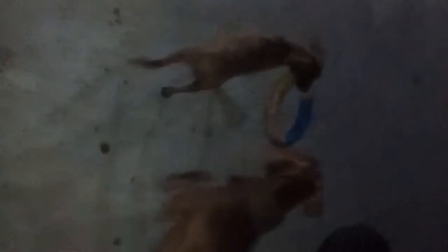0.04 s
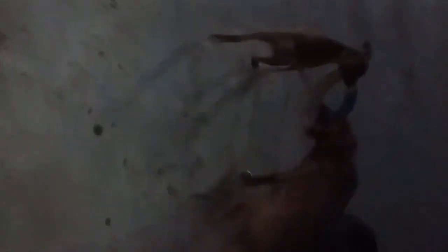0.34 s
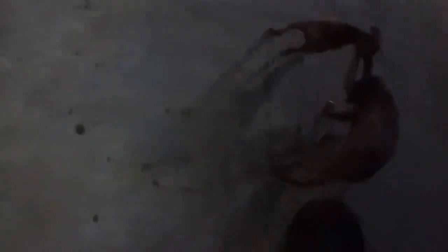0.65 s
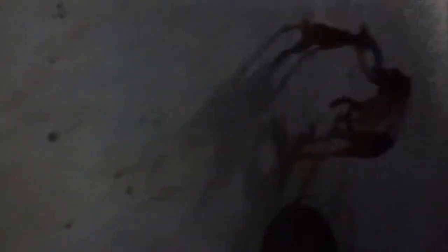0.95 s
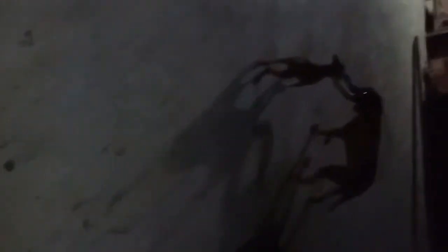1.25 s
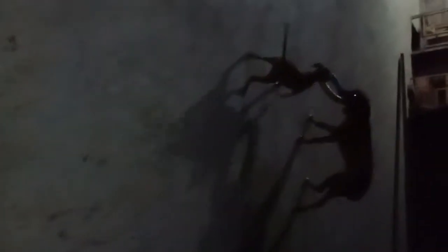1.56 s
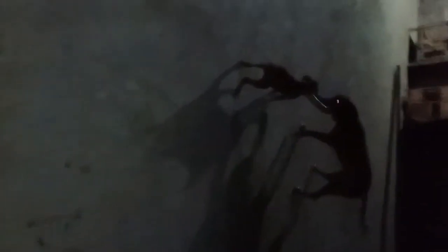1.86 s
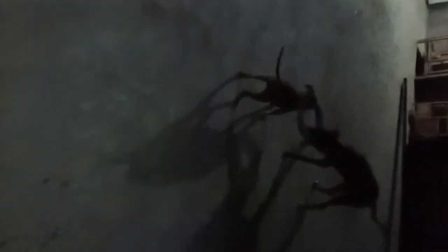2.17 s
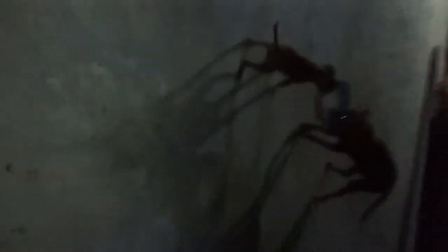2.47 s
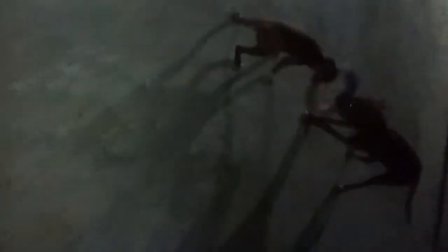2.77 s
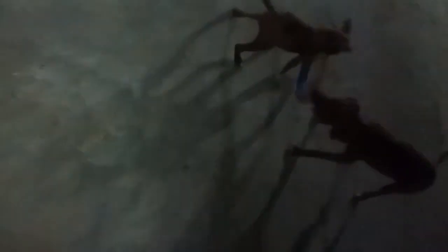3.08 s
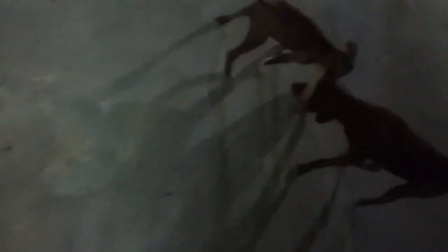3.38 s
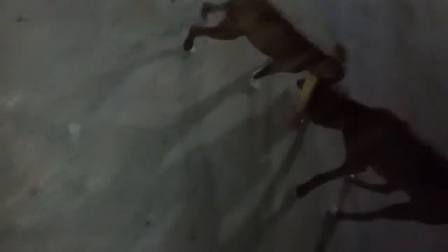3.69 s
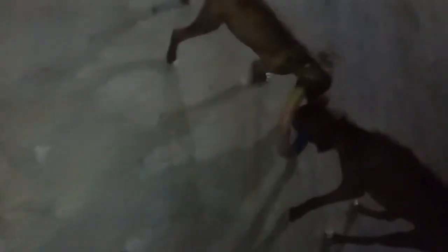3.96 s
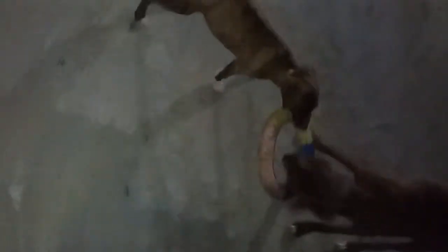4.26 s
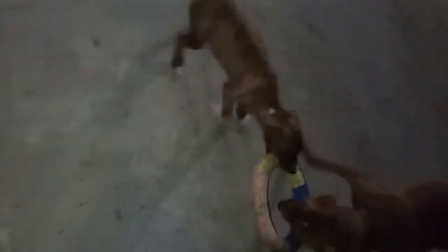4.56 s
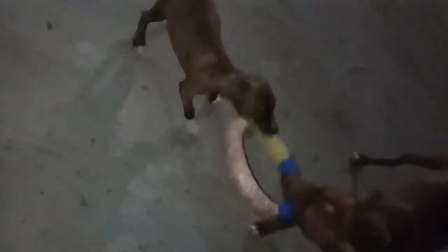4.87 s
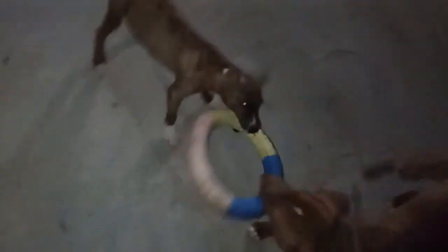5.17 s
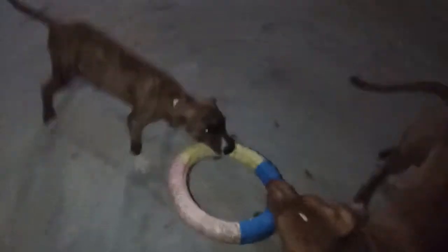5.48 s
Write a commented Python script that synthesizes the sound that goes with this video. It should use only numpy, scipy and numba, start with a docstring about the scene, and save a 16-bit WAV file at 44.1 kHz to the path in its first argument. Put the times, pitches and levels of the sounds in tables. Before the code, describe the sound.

Young dogs play tug with a rubber toy in a bare, slightly echoing room, heard from close by. A tap on the microphone and faint snuffling come first, then low, fluttering growls follow one another with short breaks. Paws scrape the concrete and claws click now and then. A sharp knock of teeth lands during a stronger growl late on, and the final growl ends in a small whine.

```python
"""Two young dogs tug at a ring toy on the concrete floor of a bare room, whose hard walls answer them.
First the microphone's case is tapped; paws scuff, claws click and the dogs snuffle round the toy.
From 0.75 s they growl in short runs: uneven throat pulses, shaken by a slow flutter, ring in chest,
nose and a mouth clamped on the toy. Near 2.9 s a tooth squeaks on the rubber, near 4.4 s teeth knock
together, and at 5.5 s the last growl tightens into a whine."""
import sys
import numpy as np
from scipy import signal
from scipy.fft import rfft, irfft
from scipy.io import wavfile
from scipy.ndimage import uniform_filter1d
from numba import njit

SR = 44100
rng = np.random.default_rng(int(sys.argv[2]) if len(sys.argv) > 2 else 0)


def log_audio(samples):
    """Write samples as a 16-bit WAV file to the path given in sys.argv[1]."""
    # one column per channel
    frames = np.atleast_2d(samples).T
    # limit to full scale, then quantise
    limited = np.clip(frames, -1, 1)
    pcm = np.round(limited * 32767).astype(np.int16)
    wavfile.write(sys.argv[1], SR, pcm)


N = 252693
TIME = np.arange(N) / SR

# Spectrum of the surroundings. Each row: frequency in Hz, relative spectral density in dB.
AIR_SPECTRUM = [(30, -19.5), (100, 1), (200, 1.5), (360, -7.5), (560, -15), (850, -10.5), (1250, -10),
                (1700, -17), (2700, -23.5), (4400, -20.5), (5400, -28), (6200, -38.5), (7500, -22.5),
                (13000, -60.5)]
# First reflections off floor and walls. Each row: mean delay in seconds, gain in dB.
REFLECTIONS = [(.0055, -21.5), (0.0143, -12), (0.0207, -20.5)]
# A tap on the microphone's case. Its one row: start in seconds, crack peak in dB, thump level in dB,
# thump centre in Hz, thump decay time in seconds.
TAP = (0.0045, -21, -40, 480, .007)
# Modes of the case. Each row: frequency in Hz, relative level in dB, time to fall 60 dB in seconds.
TAP_MODES = [(1280, -16, 0.01), (2700, -1.5, 0.0055), (3930, -3.5, 0.0058)]
# Paws landing. Each row: start in seconds, initial level in dB.
PAW_STEPS = [(0.29, -67), (0.588, -58), (2.939, -41)]
# Single scuffs of paws, from faint to loud. Each row: start in seconds, level in dB,
# fade time in seconds, lowest resonance in Hz.
PAW_SCUFFS = [(0.135, -51.5, 0.0078, 3420), (0.205, -61, 0.063, 3600), (0.591, -45, 0.0075, 3700),
              (0.615, -60, 0.077, 3570), (.69, -59.5, 0.036, 3100), (1.42, -66.5, 0.063, 3900),
              (2.076, -68.5, 0.037, 2820), (4.015, -73, 0.077, 3300), (4.06, -64.5, 0.031, 1920),
              (5.124, -49, 0.0098, 2460), (2.24, -55.5, 0.034, 3740), (2.489, -52.5, 0.02, 2720),
              (2.708, -45, 0.036, 2940), (2.805, -50.5, 0.048, 2570), (2.88, -50, 0.029, 2900),
              (3.03, -54, 0.039, 2470), (2.94, -39, 0.019, 2920), (3.253, -49, 0.03, 2900),
              (3.36, -55, 0.047, 2780), (3.48, -72, 0.075, 3470), (3.731, -61, 0.035, 2970),
              (3.78, -58, 0.011, 2970), (4.837, -50, 0.1, 3250), (4.938, -30.5, 0.01, 2570),
              (5.058, -48, 0.024, 2470), (5.225, -31.5, 0.025, 2860), (5.406, -40, 0.011, 2970),
              (5.482, -39.5, 0.019, 2980)]
# Clicks of teeth and claws. Each row: start in seconds, peak in dB, centre in Hz.
HARD_CLICKS = [(0.139, -48, 5000), (2.243, -42, 5550), (2.443, -31.5, 4050), (2.946, -32, 2580),
               (2.962, -33, 3900), (3.52, -52.5, 4200), (4.908, -36, 4636), (4.948, -29, 4610),
               (5.232, -26, 4350)]
# A tooth slips on the rubber. Its one row: start and length in seconds, peak in dB,
# first and last frequency in Hz.
TOOTH_SLIP = (2.936, .012, -34, 1600, 2900)
# Teeth knock together, and a wall returns the knock. Each row: start in seconds, peak in dB.
TOOTH_KNOCKS = [(4.3618, -14), (4.3755, -39)]
# Modes of a knock. Each row: frequency in Hz, relative level in dB, time to fall 60 dB in seconds.
TOOTH_MODES = [(1800, -17, 0.004), (2570, 1, 0.01), (3020, -5.5, 0.011), (3510, -5.5, 0.01),
               (4210, -14.5, 0.0075)]
# Air drawn past the toy. Each row: start and length in seconds, level in dB, resonance in Hz.
SNUFFLE_BREATHS = [(0.183, 0.066, -67, 1362), (0.447, 0.09, -60, 392), (0.525, 0.041, -56, 1324),
                   (0.585, 0.11, -50.5, 1228), (0.629, .009, -47, 1254), (1.295, 0.041, -57.5, 1240),
                   (1.384, 0.0543, -51, 1395), (2.075, 0.044, -46.5, 1293), (3.952, 0.051, -56.5, 1294)]
# Hard catches in the throat. Each row: start in seconds, peak in dB, mouth resonance in Hz.
THROAT_CATCHES = [(1.007, -24.5, 1043), (1.073, -22.5, 960), (1.471, -41.5, 960), (1.51, -33, 920),
                  (1.643, -28.5, 953), (2.607, -24, 990), (3.327, -37.5, 1110), (4.159, -25, 1086),
                  (4.228, -23, 1034), (4.283, -24, 1005), (4.306, -22.5, 936), (5.653, -21, 774)]
# The lips part and one resonance rings out. Each row: start and length in seconds,
# first and last centre in Hz, level in dB.
LIP_FLARES = [ (1.066, 0.048, 5100, 5430, -67.5), (1.517, 0.12, 3160, 3230, -66),
              (1.723, 0.048, 3170, 3630, -61), (1.812, 0.068, 5490, 5500, -74.5),
              (1.886, 0.064, 3000, 3300, -67), (2.311, 0.074, 830, 844, -40),
              (2.329, 0.094, 3530, 3350, -61.5), (2.619, 0.041, 1250, 1150, -37.5),
              (2.53, 0.075, 2710, 2750, -63.5), (3.699, 0.13, 2860, 2870, -63.5),
              (4.152, .16, 1100, 980, -32), (4.146, 0.11, 5460, 5440, -63), (4.241, .09, 5100, 4740, -54.5),
              (4.432, 0.13, 4900, 4940, -57), (4.648, 0.042, 5450, 5420, -63.5),
              (5.161, 0.047, 776, 764, -52.5), (5.218, 0.038, 1110, 1100, -43.5),
              (5.58, .14, 2120, 2300, -67)]
# Clear chest tones, one curve for each. Each row: time in seconds, frequency in Hz, level in dB.
CHEST_CURVES = [
    [(3.2, 143.7, -47), (3.3, 140, -52), (3.39, 147.5, -45), (3.48, 135.6, -53), (3.55, 138.3, -55),
     (3.6, 140, -51), (3.78, 138, -48.5), (3.83, 136.8, -58)],
    [(4.17, 171, -47.5), (4.378, 158.4, -42), (4.544, 158.9, -48.5), (4.612, 167.2, -38),
     (4.76, 161.3, -46), (4.884, 153, -48.5), (4.91, 169, -41.5), (4.97, 170, -59)],
    [(5.28, 193.5, -51.5), (5.32, 190.3, -35), (5.39, 207.8, -49), (5.444, 189.3, -46.5),
     (5.578, 178.2, -36), (5.626, 185.5, -47), (5.666, 211, -48), (5.729, 208, -45)],
]
# The closing whine. Each row: time in seconds, frequency in Hz, level in dB.
WHINE_CURVE = [(5.478, 700, -46), (5.5, 656, -43), (5.535, 615, -49), (5.58, 678, -37.5),
               (5.63, 711.5, -30), (5.675, 706, -40.5), (5.729, 705, -39)]
# Harder pulls on the jaw swell or dip the mouth's sound. Each row: time and half-width in seconds,
# change of level in dB.
JAW_TUGS = [(1.059, 0.03, 4.5), (2.47, 0.011, 4), (3.385, 0.026, 4), (3.55, .018, -6), (3.641, .025, 0.5),
            (3.811, 0.055, 6), (5.63, 0.029, -1.5)]
# The mouth's cluster of resonances. Each row: multiple of its centre, width in Hz, gain in dB.
MOUTH_FORMANTS = [(.66, 170, -6), (.83, 128.3, 1), (1.0, 164.5, 5), (1.15, 140, -3), (1.31, 169.7, -1.5),
                  (1.55, 220, -31.5)]
# That centre as the grip shifts, one curve per growl. Each row: time in seconds, centre in Hz.
JAW_CURVES = [
    [(.77, 1040), (.88, 1015), (1.0, 1038), (1.08, 977), (1.3, 940)],
    [(1.46, 1036), (1.58, 960), (1.75, 992), (1.9, 920), (2.05, 970)],
    [(2.3, 833), (2.47, 906), (2.6, 877)],
    [(2.6, 1000), (2.65, 1034), (2.72, 900), (2.9, 887)],
    [(3.2, 1046), (3.38, 1100), (3.5, 1166), (3.63, 1180), (3.8, 1115), (3.95, 1000)],
    [(4.15, 1093), (4.25, 1012), (4.34, 917), (4.48, 905), (4.57, 912), (4.7, 920), (4.82, 947),
     (5.05, 810)],
    [(5.17, 800), (5.23, 1130), (5.3, 955), (5.42, 753), (5.52, 667), (5.65, 740), (5.73, 740)],
]
# The snarl's upper resonances, one set per growl. Each row: centre in Hz, relative level in dB.
SNARL_FORMANTS = [
    [(1850, 0.5), (2780, -6.5), (3520, -7), (4680, -2), (5400, -11)],
    [(1980, 5), (2220, 4), (3250, -2), (3540, -15), (4560, -17.5), (5450, -14)],
    [(1600, -1.5), (2150, 2.5), (2700, -5.5), (3400, -8), (5500, -13.5)],
    [(1880, -4), (2780, -0.5), (3550, -15), (5420, -2)],
    [(2250, 9), (2950, 5), (3600, -2.5), (4500, 6), (5450, 4)],
    [(2180, 8.5), (2850, -0.5), (3320, 2.5), (5020, -11), (5550, -14)],
    [(2170, -2), (3190, 5), (4680, -11.5), (5500, -15)],
]
# The throat in each growl. Each row: chest and nose resonance in Hz, nose gain relative to the chest
# in dB, rasp level relative to the mouth in dB.
THROAT_SHAPES = [ (166, 380, 3.5, -24), (149.7, 373, -5, -19.5), (208, 462, -3.5, -19.5),
                 (170, 420, 1.5, -22), (102, 371, 2.5, -27.5), (170, 452, -6, -17.5), (168, 422, -1, -13)]
# The growls. Each row: start, attack, hold, release and lag of the mouth's opening in seconds,
# mouth and chest level in dB, sag in dB per second, pulse rate in Hz.
GROWL_RUNS = [ (0.752, 0.077, .32, 0.24, 0.0035, -38, -41.5, 1.5, 122),
              (1.444, 0.052, 0.48, 0.1, 0.00038, -38.5, -43.5, 7, 135.6),
              (2.296, 0.028, 0.285, 0.093, 0.0, -36, -38.5, 26, 106.4),
              (2.574, 0.084, 0.054, 0.35, 0.0, -32.5, -36.5, 9, 109.8),
              (3.152, 0.041, 0.66, 0.09, 0.04, -49, -47, 2.5, 140),
              (4.145, 0.027, 0.79, 0.15, 0.0, -34.5, -40.5, 1, 166.1),
              (5.162, 0.032, 0.49, 0.11, 0.037, -43, -39.5, -7.5, 185.2)]

JITTER, FLUTTER_HZ = .2, 44.91  # relative spread of the pulse periods; rate of the loose tissue
FLUTTER_DB_PER_HZ = 0.03  # a higher, more strained growl flutters more deeply
MOUTH_TOP_HZ = 1540  # low-pass corner of chest, nose and mouth; the rasp lies above
NOSE_DIP_HZ, NOSE_DIP_Q, NOSE_DIP_SHARE = 571, 4.8, 0.68
LIP_RISE_OCTAVES_PER_S = 0.063  # the lips draw back through a growl, lifting the upper resonances


def from_db(db):
    """Amplitude grows tenfold with every 20 dB."""
    return 10 ** (np.asarray(db) / 20)


def rms_one(x):
    """Division by the root mean square gives unit power."""
    return x / np.sqrt(np.mean(x ** 2) + 1e-20)


def even_power(x, span_s=0.027):
    """Division by a running RMS steadies the power; single pulses keep their contrast."""
    size = int(span_s * SR)
    power = uniform_filter1d(uniform_filter1d(x * x, size), size)
    return x / np.sqrt(np.abs(power) + 1e-14)


def butter(x, hz, kind, order=2):
    """A causal Butterworth filter has a maximally flat passband."""
    sections = signal.butter(order, np.clip(hz, 10, .45 * SR), kind, fs=SR, output="sos")
    return signal.sosfilt(sections, x + 1e-18)


@njit
def two_pole(x, angle, r):
    """A pair of poles at radius r and a moving angle resonates with a peak gain of 1."""
    y = np.zeros(len(x))
    for i in range(2, len(x)):
        drive = (1 - r * r) / 2 * (x[i] - x[i - 2])
        y[i] = drive + 2 * r * np.cos(angle[i]) * y[i - 1] - r * r * y[i - 2]
    return y


def resonate(x, hz, width_hz):
    """Two equal resonators in cascade give one peak with steep skirts."""
    angle, r = np.ones(len(x)) * 2 * np.pi * hz / SR, np.exp(-np.pi * width_hz / SR)
    return two_pole(two_pole(x, angle, r), angle, r)


def add(track, s, sound):
    """Superposition: a sound adds to the track from s seconds on."""
    at = max(int(s * SR), 0)
    track[at:at + len(sound)] += sound[:N - at]


def drift(size, hz):
    """Noise low-passed at hz wanders smoothly, with a spread of about 1."""
    slow = butter(rng.standard_normal(N + SR), hz, "low")[SR:]
    return rms_one(slow)[:size]


def struck(modes, t):
    """Free vibration after a blow is a sum of damped sinusoids."""
    return sum((-1) ** k * from_db(db - 60 * t / t60) * np.sin(2 * np.pi * hz * t)
               for k, (hz, db, t60) in enumerate(modes))


def air(level_db=-65):
    """Stationary noise with a shaped spectrum is the murmur of the surroundings."""
    hz, db = np.transpose(AIR_SPECTRUM)
    gain = from_db(np.interp(np.log(np.fft.rfftfreq(N, 1 / SR) + 1), np.log(hz), db))
    return from_db(level_db) * rms_one(irfft(rfft(rng.standard_normal(N)) * gain, N))


def room(x, t60_s=0.48, tail_db=-5.5, wall_cut_hz=4800):
    """Reverberation: a few distinct reflections and a diffuse tail that has lost its treble."""
    t = TIME[:SR]
    tail = rng.standard_normal(SR) * from_db(-60 * t / t60_s) * np.clip(t / 0.0027, 0, 1)
    response = butter(from_db(tail_db) * tail / np.linalg.norm(tail), wall_cut_hz, "low", order=3)
    for delay_s, db in REFLECTIONS:
        response[int(delay_s * rng.uniform(.85, 1.15) * SR)] += from_db(db)
    return signal.fftconvolve(x, response)


def moving_room(x, step_s=.16):
    """Echo paths change as the dogs move: cross-faded room responses join the direct sound."""
    out, step = np.zeros(N), int(step_s * SR)
    for centre in range(0, N + step - 1, step):
        at = np.arange(max(centre - step, 0), min(centre + step, N))
        add(out, at[0] / SR, room(x[at] * np.cos(np.pi / 2 * (at - centre) / step)))
    return x + out


def case_tap(width_hz=450, top_hz=4600):
    """An impact excites the case's modes and a dull thump, too close to stir the room."""
    s, crack_db, thump_db, hz, fade_s = TAP
    out, t = np.zeros(N), TIME[:SR // 5]
    crack = butter(struck(TAP_MODES, t), top_hz, "low", order=6)
    thump = rms_one(resonate(rng.standard_normal(len(t)), hz, width_hz)) * np.exp(-t / fade_s)
    add(out, s, from_db(crack_db) * crack / np.abs(crack).max() + from_db(thump_db) * thump)
    return out


def steps(fade_s=0.041, band_hz=(110, 520)):
    """A soft impact holds mainly low frequencies: pads thud on the concrete."""
    out, t = np.zeros(N), TIME[:SR // 4]
    for s, db in PAW_STEPS:
        thud = rms_one(butter(rng.standard_normal(len(t)), band_hz, "band"))
        add(out, s, from_db(db) * thud * np.exp(-t / fade_s))
    return out


def shuffles(per_s=7, db=-67.5, spread_db=3, fade_s=0.017, hz=2780, spread_octaves=0.3):
    """Random scatter about a walking pace gives rows of faint scuffs, varied in level and colour."""
    rows = [((k + .5 + late / 2) / per_s, db + spread_db * loud, fade_s,
             hz * 2 ** (spread_octaves * bright))
            for k, (late, loud, bright) in enumerate(rng.uniform(-1, 1, (60, 3)))]
    return [row for row in rows if row[0] < N / SR]


def scuffs(grit_db=2.5, clump_db=2.8, spacing_hz=502, width_hz=400, scatter_hz=130, rise_s=0.003,
           bare_db=-21, top_band_db=-27):
    """Sliding friction: pads and claws drag over grit in clumps of grains until the paw grips."""
    out, t = np.zeros(N), TIME[:SR // 2]
    for s, db, fade_s, lowest_hz in PAW_SCUFFS + shuffles():
        grains = rng.standard_normal(len(t))
        grains *= from_db(grit_db * drift(len(t), 800) + clump_db * drift(len(t), 60))
        centres = lowest_hz + spacing_hz * np.arange(5) + scatter_hz * rng.standard_normal(5)
        ringing = sum(resonate(grains, hz, width_hz) for hz in centres)
        scrape = rms_one(ringing + from_db(bare_db) * butter(grains, 1400, "high"))
        # A very faint high fizz is heard during each scuff.
        top_band = from_db(top_band_db) * rms_one(butter(grains, 14000, "high", order=4))
        envelope = (1 - np.exp(-t / rise_s)) * np.exp(-(t / fade_s) ** 2 / 2)
        add(out, s, from_db(db) * (scrape + top_band) * envelope)
    return out


def clicks(width_hz=950, contact_s=0.0016):
    """A brief, hard contact of tooth or claw excites one broad, high resonance."""
    out, t = np.zeros(N), TIME[:SR // 20]
    for s, db, hz in HARD_CLICKS:
        crack = resonate(rng.standard_normal(len(t)) * np.exp(-t / contact_s), hz, width_hz)
        add(out, s, from_db(db) * crack / np.abs(crack).max())
    return out


def squeak():
    """A friction tone rises with sliding speed: a tooth slips ever faster on the rubber."""
    s, length_s, db, first_hz, last_hz = TOOTH_SLIP
    out, progress = np.zeros(N), np.linspace(0, 1, int(length_s * SR))
    phase = 2 * np.pi * np.cumsum(first_hz + (last_hz - first_hz) * progress ** 3) / SR
    add(out, s, from_db(db) * np.sin(phase) * np.sin(np.pi * progress))
    return out


def knocks(low_hz=1500, top_hz=4100):
    """Heavily damped modes make the collision of teeth a short, dull knock."""
    out, t = np.zeros(N), TIME[:SR // 20]
    knock = butter(butter(struck(TOOTH_MODES, t), top_hz, "low", order=8), low_hz, "high")
    for s, db in TOOTH_KNOCKS:
        add(out, s, from_db(db) * knock / np.abs(knock).max())
    return out


def snuffles(width_hz=130, upper_hz=2700, upper_db=-34, rough_db=3, rough_hz=60):
    """Turbulence: air sucked past the toy flutters and rings in the narrow mouth."""
    out = np.zeros(N)
    for s, length_s, db, hz in SNUFFLE_BREATHS:
        flow = rng.standard_normal(SR) * from_db(rough_db * drift(SR, rough_hz))
        upper = from_db(upper_db) * resonate(flow, upper_hz, width_hz=1900)
        breath = (resonate(flow, hz, width_hz) + upper)[:int(length_s * SR)]
        add(out, s, from_db(db) * rms_one(breath) * signal.windows.tukey(len(breath), .6))
    return out


def catches(width_hz=220):
    """The mouth's impulse response sounds when the folds slap shut once, hard."""
    out = np.zeros(N)
    for s, db, hz in THROAT_CATCHES:
        ringing = resonate(signal.unit_impulse(SR // 20, 2), hz, width_hz)
        pop = butter(ringing, MOUTH_TOP_HZ, "low", order=3)
        add(out, s, from_db(db) * pop / np.abs(pop).max())
    return out


def cycle_starts(hz, jitter, size):
    """Jitter: periods of random length add up to the sample positions of an uneven oscillation."""
    at = np.cumsum(np.exp(jitter * rng.standard_normal(400)) * SR / hz).astype(int)
    return at[at < size]


def throat_pulses(size, pitch_hz, flutter_db, flutter_jitter=0.287, puff_s=0.0095):
    """The glottal source: closures of the folds, each with a turbulent puff, modulated by loose tissue."""
    swells = np.r_[0, cycle_starts(FLUTTER_HZ, flutter_jitter, size + SR // 10)]
    closures = cycle_starts(pitch_hz, JITTER, size)
    flutter = np.cos(2 * np.pi * np.interp(closures, swells, np.arange(len(swells))))
    pulses = np.zeros(size)
    pulses[closures] = from_db(flutter_db * flutter)
    puff_envelope = signal.lfilter([1], [1, -np.exp(-1 / (puff_s * SR))], pulses)
    return rms_one(pulses), rms_one(puff_envelope * rng.standard_normal(size))


def flares(width_hz=330, pitch_hz=140, breath=2.1, flutter_db=2.0):
    """A formant glide: as the lips part, throat pulses ring in one moving resonance."""
    out = np.zeros(N)
    for s, length_s, first_hz, last_hz, db in LIP_FLARES:
        size = int(length_s * SR)
        pulses, puffs = throat_pulses(size, pitch_hz, flutter_db)
        ringing = resonate(pulses + breath * puffs, np.linspace(first_hz, last_hz, size), width_hz)
        add(out, s, from_db(db) * rms_one(ringing) * signal.windows.tukey(size, .3))
    return out


def tone(curve, waver, rough_db, octave_db):
    """Nearly periodic vibration gives a fundamental and its octave, wavering along a curve."""
    s, hz, db = np.transpose(curve)
    out, t = np.zeros(N), TIME[int(s[0] * SR):int(s[-1] * SR)]
    phase = 2 * np.pi * np.cumsum(np.interp(t, s, hz) * (1 + waver * drift(len(t), 60))) / SR
    level = from_db(np.interp(t, s, db) + rough_db * drift(len(t), 50))
    wave = np.sqrt(2) * (np.sin(phase) + from_db(octave_db) * np.sin(2 * phase))
    add(out, s[0], level * wave * signal.windows.tukey(len(t), .06))
    return out


def voiced_tones():
    """Where the folds swing regularly, a clear pitch stands out: the chest tones and the whine."""
    chest = sum(tone(curve, waver=0.034, rough_db=2.0, octave_db=-16.5) for curve in CHEST_CURVES)
    return chest + tone(WHINE_CURVE, waver=0.013, rough_db=3.5, octave_db=-29)


def envelope_db(t, attack_s, hold_s, release_s, sag_db_per_s, fade_db=25):
    """Level follows the breath: attack, hold, release, and a sag as air runs out (negative swells)."""
    rise = np.minimum(t / attack_s - 1, 0)
    fall = np.maximum((t - attack_s - hold_s) / release_s, 0)
    return fade_db * (rise - fall) - sag_db_per_s * t


def growl(run, throat, jaw, snarl, breath=1.12, snap=0.05, tremble_hz=14, waver_db=1.0,
          flicker_db=5.5, chest_tug_share=0.076):
    """Source and filter: pulses ring in chest, nose and moving mouth, and rasp in upper resonances."""
    s, attack_s, hold_s, release_s, lag_s, mouth_level_db, chest_level_db, sag, pitch_hz = run
    chest_hz, nose_hz, nose_db, rasp_db = throat
    t = TIME[:int((attack_s + hold_s + release_s) * SR)]

    def shaken(hz, share):
        """Frequency modulation: the tugging shakes the lips, and every resonance trembles."""
        return hz * np.exp(share * drift(len(t), tremble_hz))

    tug_db = sum(db * np.exp(-((s + t - at_s) / width_s) ** 2 / 2) for at_s, width_s, db in JAW_TUGS)
    mouth_db = mouth_level_db + envelope_db(t - lag_s, attack_s, hold_s - lag_s, release_s, sag)
    mouth_db += tug_db + waver_db * drift(len(t), tremble_hz)
    chest_db = chest_level_db + envelope_db(t, attack_s, hold_s, release_s, sag)
    chest_db += chest_tug_share * tug_db
    mouth_hz = shaken(np.interp(s + t, *np.transpose(jaw)), 0.044)
    lip_lift = 2 ** (LIP_RISE_OCTAVES_PER_S * (t - t.mean()))

    pulses, puffs = throat_pulses(len(t), pitch_hz, FLUTTER_DB_PER_HZ * pitch_hz)
    flow = pulses + breath * puffs
    # Antiresonance: the nasal passage, a side branch, swallows most of one narrow band.
    flow -= NOSE_DIP_SHARE * signal.lfilter(*signal.iirpeak(NOSE_DIP_HZ, NOSE_DIP_Q, fs=SR), flow)
    chest = resonate(flow, shaken(chest_hz, .08), width_hz=150)
    nose = from_db(nose_db) * resonate(flow, shaken(nose_hz, .08), width_hz=180)
    mouth = sum((-1) ** i * from_db(db) * resonate(flow, ratio * mouth_hz, width_hz)
                for i, (ratio, width_hz, db) in enumerate(MOUTH_FORMANTS))
    rasp = np.zeros(len(t))
    for hz, db in snarl:
        gain = from_db(db + flicker_db * drift(len(t), tremble_hz))
        ringing = resonate(puffs + snap * pulses, shaken(hz * lip_lift, 0.017), width_hz=230)
        rasp += gain * rms_one(ringing)

    body = even_power(butter(chest - nose, MOUTH_TOP_HZ, "low", order=3))
    muzzle = even_power(butter(mouth, MOUTH_TOP_HZ, "low", order=5))
    muzzle += from_db(rasp_db) * even_power(rasp)
    return (from_db(chest_db) * body + from_db(mouth_db) * muzzle) * signal.windows.tukey(len(t), .02)


def growls():
    """The shape of the vocal tract sets the timbre: each growl has its own throat, jaw and snarl."""
    out = np.zeros(N)
    for run, throat, jaw, snarl in zip(GROWL_RUNS, THROAT_SHAPES, JAW_CURVES, SNARL_FORMANTS):
        add(out, run[0], growl(run, throat, jaw, snarl))
    return out


def scene(tone_room_share=0.33):
    """Direct and reflected sound superpose; only a share of the clear tones excites the room."""
    voices = growls() + flares() + catches() + snuffles()
    tones = voiced_tones()
    contacts = scuffs() + clicks() + knocks() + squeak() + steps()
    in_room = moving_room(voices + contacts + tone_room_share * tones)
    return (in_room + (1 - tone_room_share) * tones + case_tap() + air())[None]


def record(dry, low_hz=58, top_hz=6730, cutoff_hz=15800, leak_db=-15, top_band_db=-7, hiss_db=-90):
    """Band-pass filtering dulls the sound: thin bass, little treble. A faint hiss lies above 12 kHz."""
    hiss = from_db(hiss_db) * rms_one(butter(rng.standard_normal(dry.shape), 12000, "high", order=4))
    leak = from_db(leak_db) * butter(dry, [6200, 8200], "band", order=4)
    top_band = from_db(top_band_db) * butter(dry, 16000, "high", order=4)
    passband = butter(butter(dry, low_hz, "high"), top_hz, "low", order=20)
    steep_low_pass = signal.ellip(10, .1, 80, cutoff_hz, fs=SR, output="sos")
    return signal.sosfilt(steep_low_pass, passband + leak + top_band + hiss)


dry = scene()
out = record(dry)
log_audio(out)
```